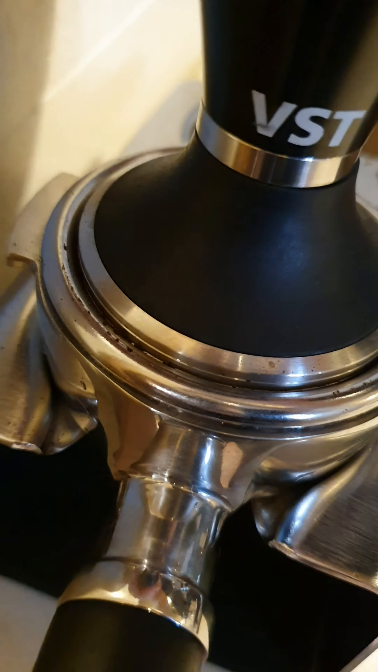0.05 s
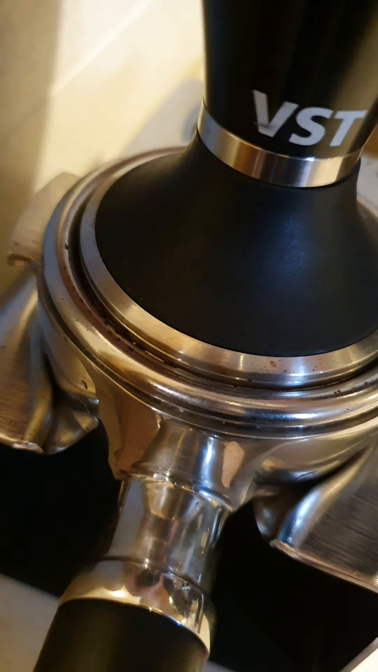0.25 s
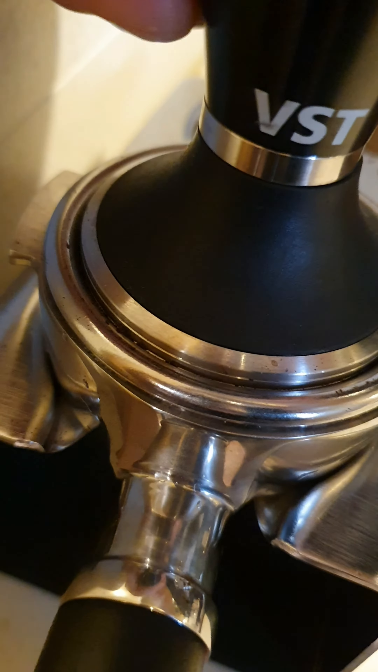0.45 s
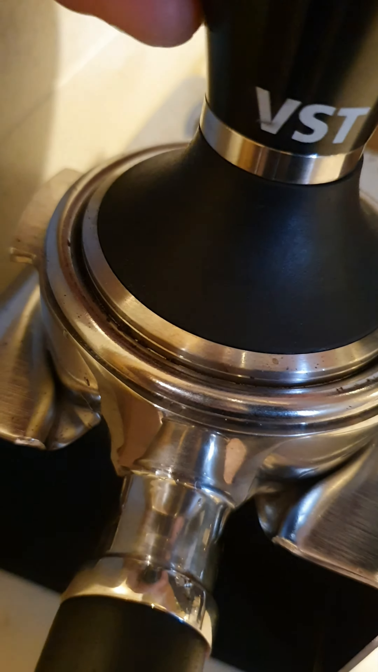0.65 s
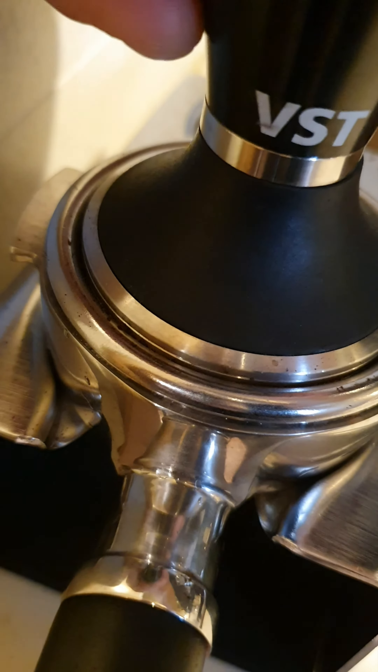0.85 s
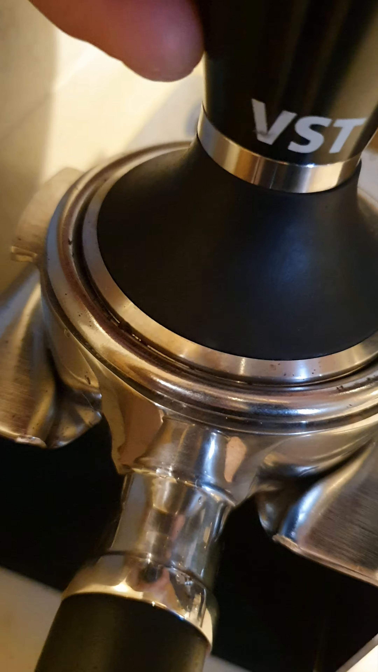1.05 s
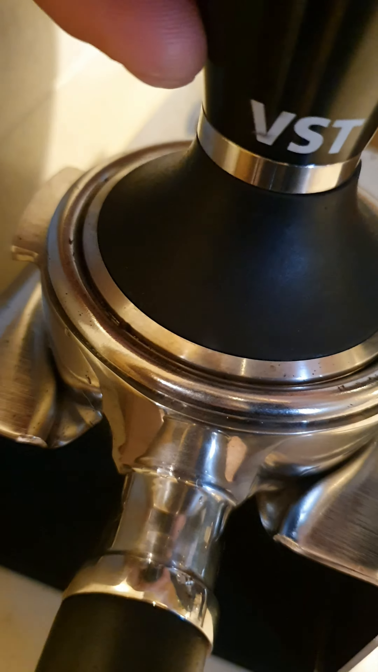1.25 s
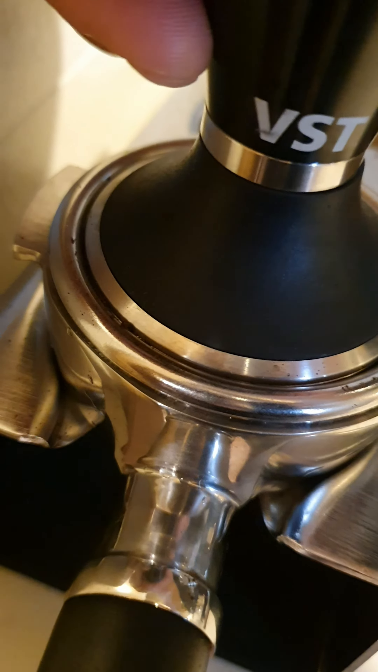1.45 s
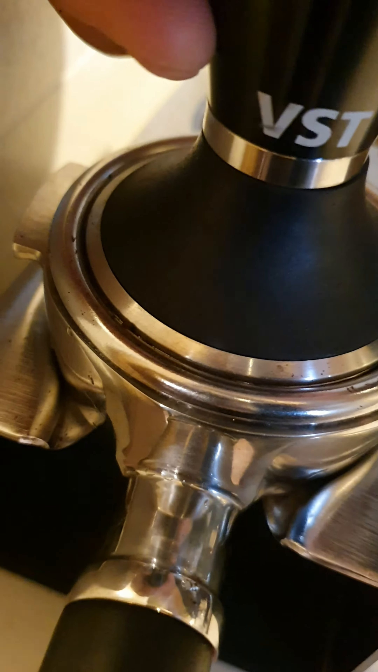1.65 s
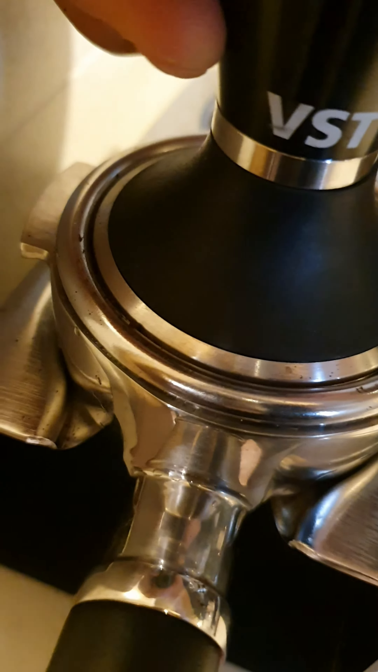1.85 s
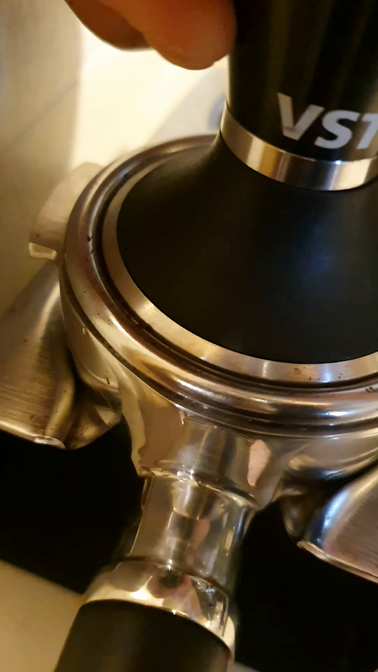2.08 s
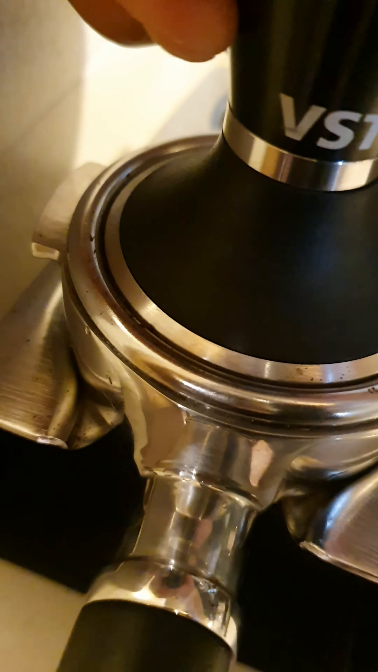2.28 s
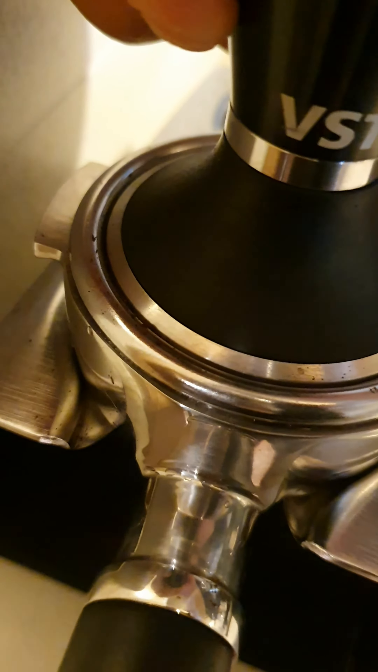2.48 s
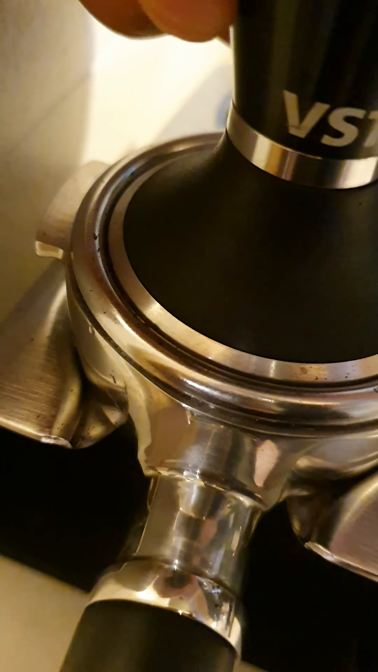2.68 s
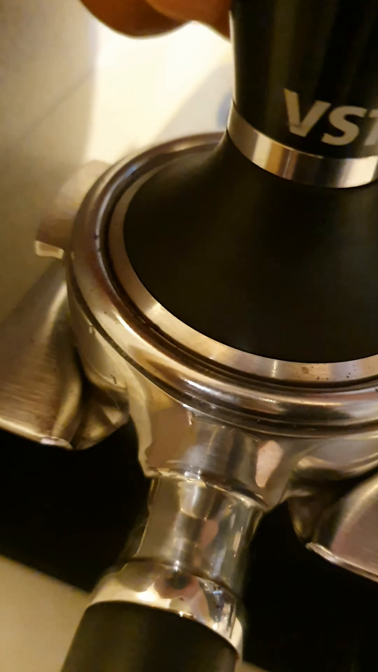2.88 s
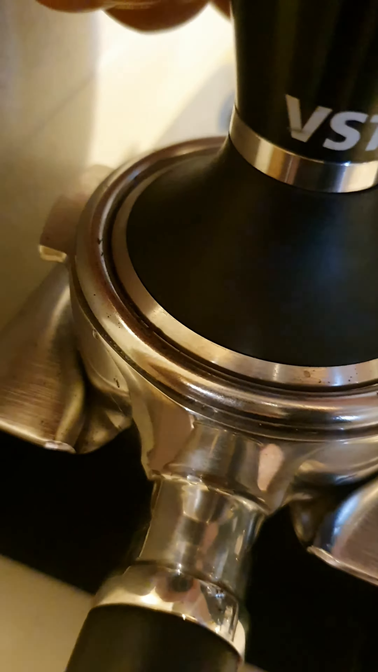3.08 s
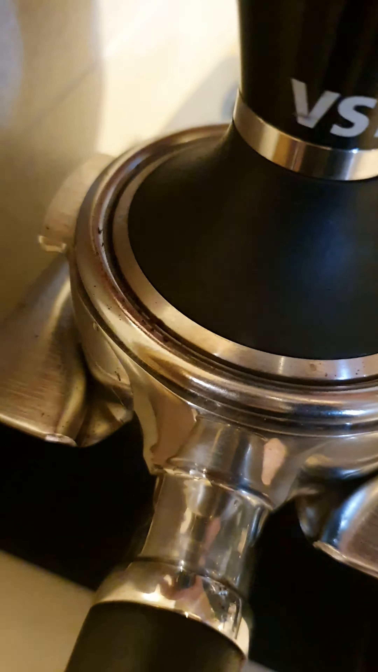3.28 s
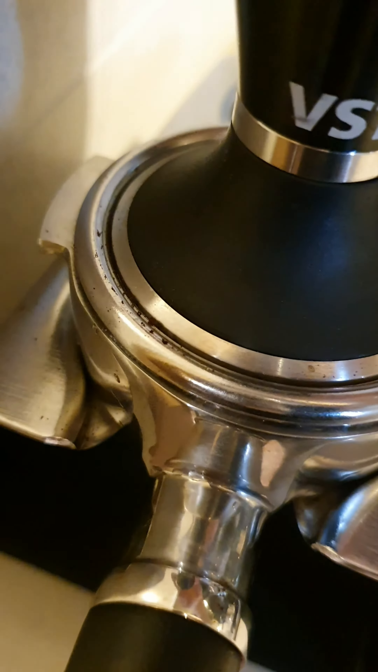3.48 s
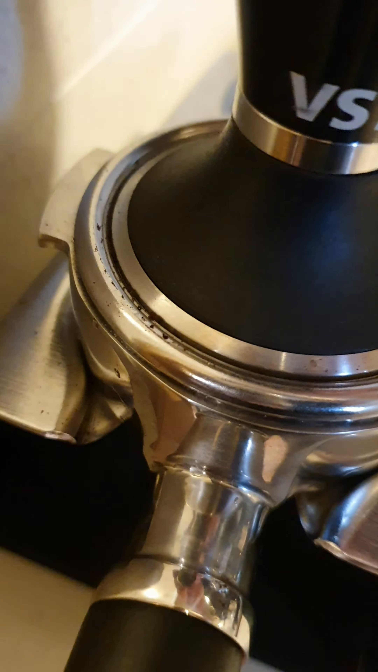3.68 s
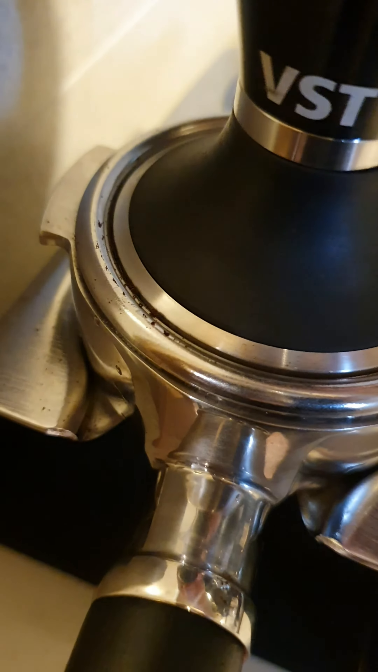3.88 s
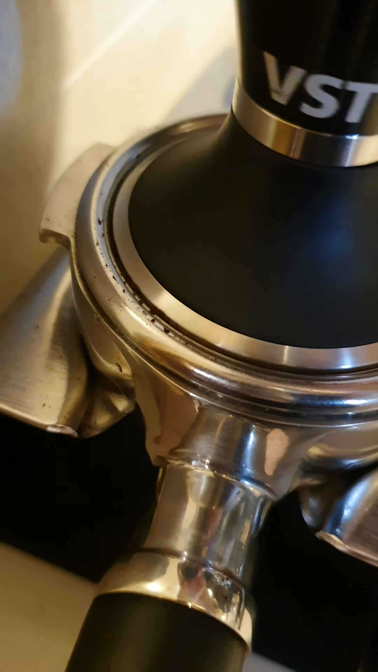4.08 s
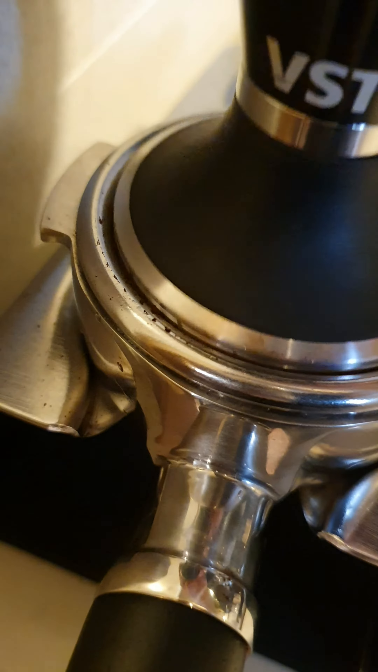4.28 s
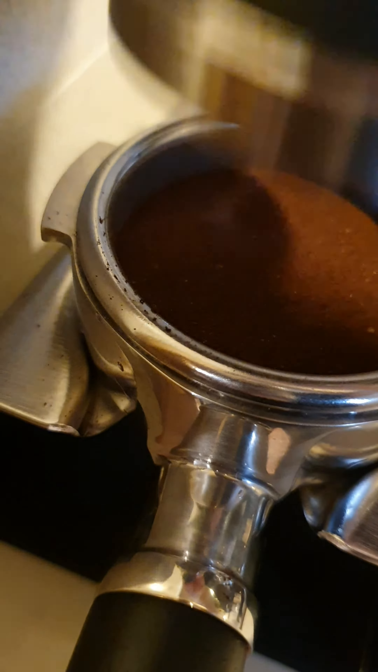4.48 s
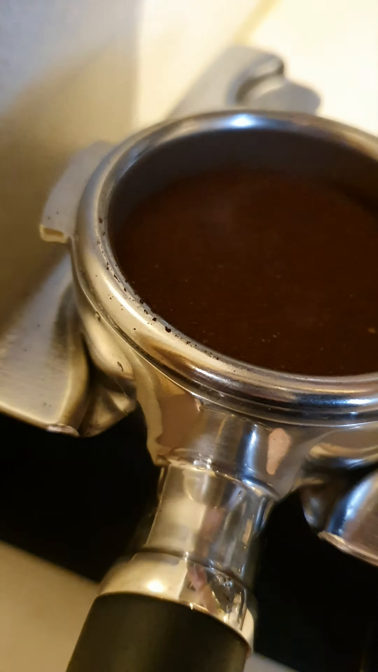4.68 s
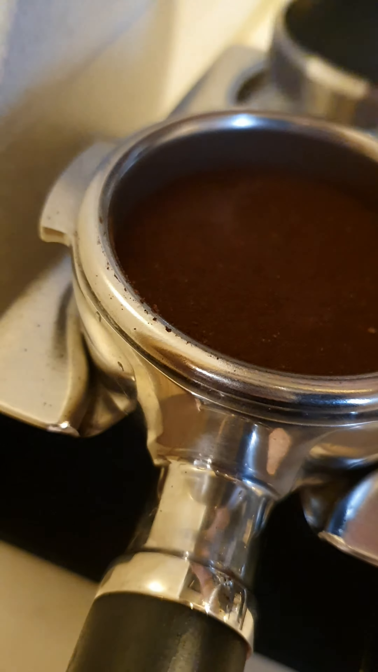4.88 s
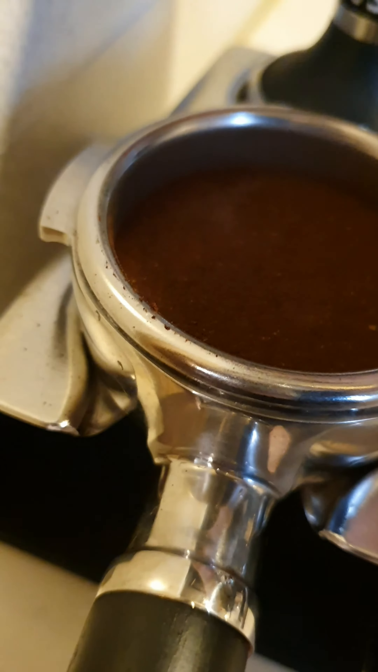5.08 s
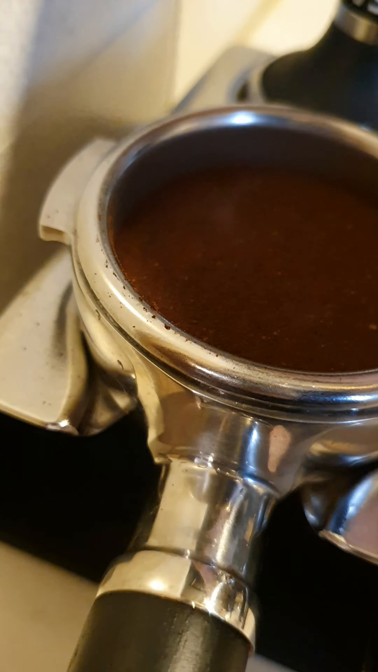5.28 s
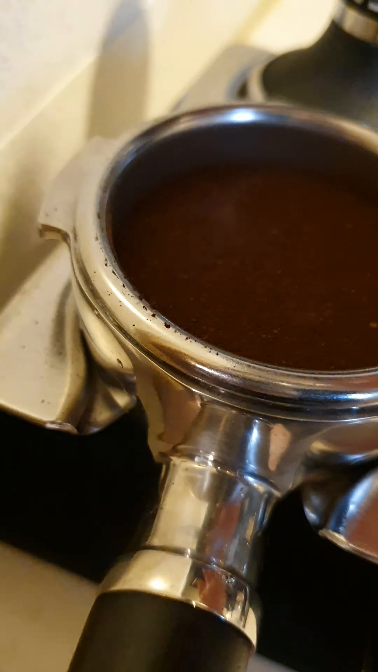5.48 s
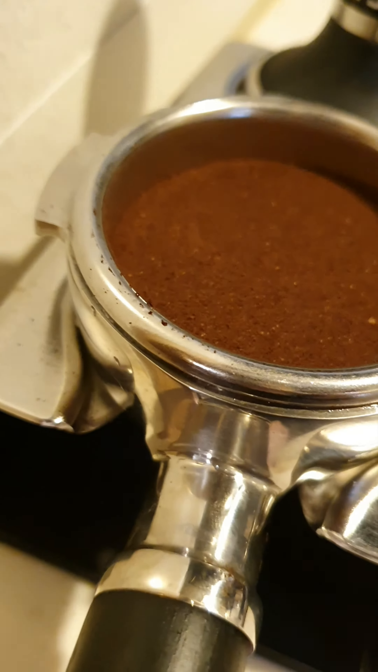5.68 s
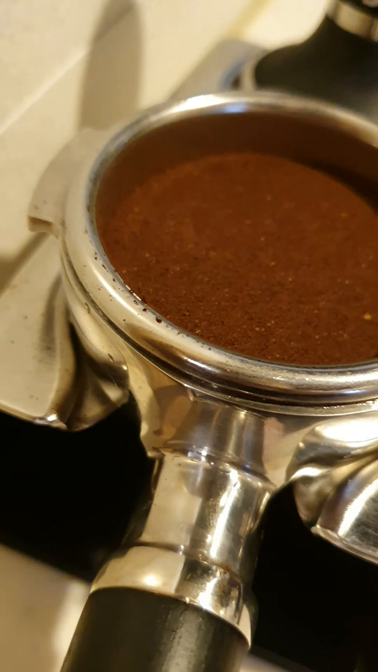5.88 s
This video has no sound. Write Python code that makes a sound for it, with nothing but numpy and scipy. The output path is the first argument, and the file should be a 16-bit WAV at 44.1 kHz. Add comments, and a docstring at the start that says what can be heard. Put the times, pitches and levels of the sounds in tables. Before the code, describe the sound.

Close up in a small kitchen with a faint steady appliance hum, a metal tamper works coffee grounds in a steel basket. Dull knocks, short rubs and low hand rumble come in clusters, with one tiny glass clink at about two seconds. Gritty swishes follow near four seconds, then the tamper lands loudly on the counter at five, rebounds quickly and rings briefly.

```python
"""Tamping coffee by hand

A metal tamper is pressed and twisted on coffee grounds in a steel basket that knocks on its stand, then is
set down on the counter with a clack that bounces. A phone held close hears it in a small kitchen with a
steady appliance hum; a glass clinks once further off. Struck things are sums of decaying modes with contact
noise; rubs and twists are grainy filtered noise; rumble, hum and room tail are shaped noise."""
import sys
import numpy as np
from scipy import signal
from scipy.fft import rfft, irfft
from scipy.io import wavfile
from scipy.ndimage import uniform_filter1d

SR = 44100
rng = np.random.default_rng(int(sys.argv[2]) if len(sys.argv) > 2 else 0)


def unload_wav(signal):
    """Save mono or channel-first audio to the path in sys.argv[1] as 16-bit WAV at rate SR, clipped to [-1, 1]."""
    wavfile.write(
        sys.argv[1],
        SR,
        np.round(np.clip(np.atleast_2d(signal).T, -1, 1) * 32767).astype(np.int16),
    )


def linear_from_db(decibels):
    """Turn decibels (scalar or array-like) into linear amplitude factors; 0 gives 1."""
    return 10 ** (np.asarray(decibels, float) / 20)


N = 261954
T = np.arange(N) / SR
SIDES = np.array([[.5], [-.5]])  # times a left-minus-right difference in dB

# tamper landing on the counter and bouncing: start_s, nominal peak_db, brightness_db_per_octave
LANDINGS = [(5.028, -7.5, 4.5), (5.056, -3.5, 3), (5.144, -12.5, 0.5), (5.313, -52.5, 12)]
# modes of tamper and counter: pitch_hz, relative level_db, t60_s
TAMPER_MODES = [(145, -12.5, 0.3), (183, -11, 0.3), (221.6, -12.5, 0.38), (274.5, 0, 0.3),
                (343.4, -14, 0.42), (378, -5, 0.28), (472, -7, 0.25), (595, -5, 0.2), (665, -11, 0.27),
                (730, -14, 0.2), (850, -10, 0.15), (1365, -1.5, 0.052), (1514, -3, 0.05), (1635, -5, 0.045),
                (1725, -8.5, 0.035), (1838, -9, 0.04), (2667, 2, 0.036), (3450, -3, 0.013),
                (5040, -2, 0.023), (9100, -13.5, 0.025), (11320, -14, 0.016)]
# colour of the landing's contact noise: frequency_hz, relative density_db
LANDING_NOISE = [(71, -47.5), (120, -10), (261, 0), (1070, -14.5), (1340, -7.5), (3520, -13.5), (4230, -18),
                 (11800, -27), (16000, -30)]
# basket knocking on its stand: start_s, nominal peak_db, brightness_db_per_octave
BASKET_KNOCKS = [(0.03, -31.5, -13), (1.203, -29, 5), (1.725, -34.5, -3.5), (1.788, -34.5, -0.5),
                 (1.95, -33.5, -11), (2.294, -38, -2.5), (2.373, -36, -0.5), (2.603, -31.5, 5),
                 (2.668, -32, 0.5), (2.716, -28.5, 10), (2.81, -30.5, -1.5), (3.565, -39, -11),
                 (4.063, -28, 0.5)]
# modes of basket, handle and stand: pitch_hz, relative level_db, t60_s
BASKET_MODES = [(124, -17, 0.048), (230.5, -15, 0.25), (275, -2, 0.092), (402, -2.5, 0.038),
                (646, -3, 0.055), (1400, -1, 0.027), (1492, 14, 0.021), (2050, -4, 0.066),
                (2950, -18, 0.012), (3610, -20, 0.016)]
# colour of the knocks' contact noise: frequency_hz, relative density_db
KNOCK_NOISE = [(60, 0), (200, 18), (650, 14.5), (1000, 11.5), (2000, 8), (5000, -14), (8000, -28),
               (16000, -24)]
# tamper rim twisting against grounds and basket wall: start_s, length_s, level_db
RIM_TWISTS = [(1.68, 0.12, -64), (2.61, 0.076, -64.5), (2.71, 0.11, -63.5), (2.827, 0.138, -63),
              (2.95, 0.13, -67), (3.266, 0.074, -68), (3.741, 0.16, -56.5), (3.927, 0.081, -55.5),
              (4.007, 0.095, -56), (4.085, 0.097, -61.5), (3.778, 0.79, -70), (4.196, 0.069, -70),
              (4.304, 0.11, -53)]
# colour of crushed grit: frequency_hz, relative density_db
GRIT_COLOUR = [(1500, -3), (2800, 2), (4000, -5), (6300, 1), (7100, -2), (8000, 3), (10500, -6),
               (14500, -5), (16000, -18)]
# broad rubs of steel on the stand: start_s, nominal length_s, level_db
STEEL_RUBS = [(0., 0.1, -51.5), (1.558, 0.044, -51), (1.611, 0.051, -54), (2.911, 0.022, -49),
              (3.011, 0.049, -58.5), (3.192, 0.12, -63), (3.647, 0.053, -63), (5.458, 0.061, -63),
              (5.682, 0.12, -57.5)]
# narrow squeaks: start_s, nominal length_s, level_db, pitch_hz
NARROW_SQUEAKS = [(1.071, 0.072, -58, 1294), (4.352, 0.047, -65.5, 2800), (4.612, 0.07, -57.5, 935)]
# single gritty ticks: start_s, nominal length_s, level_db, centre_hz
GRITTY_TICKS = [(1.006, 0.012, -67, 9000), (1.032, 0.0079, -65, 9000), (1.495, 0.015, -69.5, 6800),
                (2.205, 0.01, -60.5, 900), (2.64, .008, -66.5, 8300), (2.899, 0.005, -65, 5000),
                (2.983, 0.0046, -45, 1100), (3.324, 0.0084, -55, 13500), (3.4, 0.0027, -54, 860)]
# dull thumps of the counter as the hand shifts its weight: start_s, nominal peak_db, pitch_hz
COUNTER_THUMPS = [(1.208, -40, 266), (1.728, -42.5, 211), (1.762, -38, 275), (1.8, -42.5, 279.6),
                  (2.815, -37, 109), (2.967, -35.5, 107), (2.987, -46, 125), (3.74, -42.5, 266),
                  (3.77, -41.5, 262), (3.801, -44, 332.6)]
# hand pressure felt through the counter: time_s, rumble level_db
HAND_PRESSURE = [(0.0, -62), (0.4, -65), (0.65, -68), (1.27, -59), (1.45, -59), (1.8, -54.5), (2.15, -61.5),
                 (2.5, -53.5), (2.8, -51.5), (2.9, -49), (3.1, -60.5), (3.36, -65.5), (3.9, -58),
                 (4.4, -62.5), (5.0, -60), (5.9, -62.5)]
# the glass touched once: start_s, nominal peak_db, brightness_db_per_octave
GLASS_CLINK = [(2.0739, -41.5, -1.5)]
# modes of the glass: pitch_hz, relative level_db, t60_s
GLASS_MODES = [(3042, 2, .09), (4250, -3, .08), (4301, -2, .21), (5814, 3, .17), (7574, -8, .11),
               (9485, -8, .1), (10520, -6, .09), (11570, -6, .11), (13880, -9, .08)]
# decay of the room: frequency_hz, t60_s
ROOM_DECAY = [(60, 0.77), (250, 0.45), (480, 0.57), (900, 0.39), (2000, 0.18), (6000, 0.24), (14000, 0.3)]
# colour of the appliance hum: frequency_hz, relative density_db
HUM_COLOUR = [(15, -34.5), (30, -4.5), (45, -7), (59, -11), (153, -30.5), (263, -5), (317, -26),
              (344, -13.5), (545, -17), (887, -19.5), (1940, -22), (3620, -38), (12000, -47.5),
              (15700, -47.5), (16000, -74.5)]
# narrow bands that stand out of the hum, or dip if negative: centre_hz, width_hz, height_db
HUM_BANDS = [(279.3, 15, 9), (564, 40, 7.5), (1280, 640, -7), (1604, 78, 7.5), (2098, 49, 9.5),
             (2318, 77, 7), (3084, 15, 10), (4657, 770, 7.5), (9000, 1700, 6)]
# correlation of left and right in the hum: frequency_hz, likeness_0_to_1
HUM_LIKENESS = [(130, 0.96), (290, 0.85), (640, 0.3), (1400, 0.)]
# balance of the hum: frequency_hz, left_minus_right_db
HUM_LEAN = [(60, 5), (700, 3.5), (1290, -3), (2380, 4.5), (8000, 4.5), (15000, 4)]


def over_hz(table, count):
    """Log-frequency interpolation: a table read at the spectral bins of count samples."""
    hz, value = np.transpose(table)
    return np.interp(np.log(np.fft.rfftfreq(count, 1 / SR) + 1), np.log(hz), value)


def unit(x):
    """Normalisation to an rms of 1."""
    return x / np.sqrt(np.mean(x ** 2))


def noise(table, count):
    """Spectral shaping: white noise takes the colour of a table, at rms 1."""
    spectrum = rfft(rng.standard_normal(count)) * linear_from_db(over_hz(table, count))
    return unit(irfft(spectrum, count))


def band(x, hz, width):
    """Band-pass filtering around a centre, as by one broad resonance."""
    edges = np.clip([hz - width / 2, hz + width / 2], 20, .45 * SR)
    return signal.sosfilt(signal.butter(2, edges, "band", fs=SR, output="sos"), x)


def curve(rows, rest_db):
    """Linear interpolation of level in dB over time."""
    s, db = np.transpose(rows)
    return np.interp(T, s, db, rest_db, rest_db)


def flicker(rate, db):
    """Random amplitude modulation: smoothed gain steps about 1, rate of them a second."""
    k = int(SR / rate)
    steps = np.repeat(rng.standard_normal(N // k + 1), k)
    return linear_from_db(db * uniform_filter1d(steps, k)[:N])


def add(out, x, s):
    """Superposition: a stereo sound is mixed in at a time."""
    i = int(s * SR)
    out[:, i:i + x.shape[1]] += x[:, :N - i]


def contact(table, tilt_db, count):
    """Contact noise: a brighter blow has less bass; both ports share the bass but differ above it."""
    table = [(hz, db + 0.32 * tilt_db * np.log2(np.clip(hz, 220., 1500.) / 1000)) for hz, db in table]
    mid = noise(table, count)
    side = band(noise(table, count), 8670.0, 17000.)
    return mid + 2 * SIDES * side


def modal_ring(modes, tilt_db, t, split_hz, apart, scatter_db):
    """Modal synthesis: beating decaying sines, the high ones at unlike phases in the two ports."""
    hz, db, t60 = np.transpose(modes)[:, :, None]
    tilt = tilt_db * np.log2(np.maximum(hz, 300.) / 1000)
    gain = linear_from_db(db + tilt + scatter_db * rng.standard_normal(hz.shape))
    lag = rng.uniform(0, 2 * np.pi, (2, len(hz), 1)) * np.clip(hz / 1500 - .15, 0, apart)
    beat_hz = split_hz * rng.uniform(.5, 0.91, hz.shape)
    beat = 1 + 0.57 * np.cos(2 * np.pi * beat_hz * t + lag)  # modes come in close pairs
    decay = np.exp(-np.log(1000) * t / t60)
    ring = (gain * beat * decay * np.sin(2 * np.pi * hz * t + lag)).sum(axis=1)
    return ring / np.sqrt(np.sum(gain ** 2))


def blows(rows, modes, rise_s, chatter_s, chatter, pan_db, split_hz, apart, scatter_db, crack_db, crack):
    """Impact excitation: each blow and its brief chatter ring the modes and make contact noise."""
    rings, cracks, t = np.zeros((2, N)), np.zeros((2, N)), T[:SR // 2]
    hardest_db = max(row[1] for row in rows)
    for s, peak_db, tilt_db in rows:
        # lighter blows chatter for less time; duller contact starts slower
        fade_s = chatter_s * linear_from_db(max(0.5 * (peak_db - hardest_db), -5.))
        fade = np.exp(-(t / fade_s) ** 2)
        rise = 1 - np.exp(-(t / rise_s / linear_from_db(max(-tilt_db, 0))) ** 2)
        push = chatter * rng.standard_normal(len(t)) * fade
        push[0] = 1  # first contact
        push = push / np.sqrt(np.sum(push ** 2))
        ring = modal_ring(modes, tilt_db, t, split_hz, apart, scatter_db) * rise
        sound = signal.fftconvolve(ring, push[None], axes=1)[:, :len(t)]
        hiss = contact(crack, tilt_db, len(t)) * fade * rise
        add(rings, sound * linear_from_db(peak_db + SIDES * pan_db), s)
        add(cracks, hiss * linear_from_db(peak_db + crack_db + SIDES * pan_db), s)
    return rings, cracks


def landing_clacks():
    """Repeated impact: the tamper strikes the counter and bounces; returns ring and contact noise."""
    return blows(LANDINGS, TAMPER_MODES, rise_s=0.00021, chatter_s=0.013, chatter=.03, pan_db=4.0,
                 split_hz=18.0, apart=0.99, scatter_db=1.0, crack_db=-11.0, crack=LANDING_NOISE)


def basket_knocks():
    """Soft impact: the basket strikes its stand with a slower rise; returns ring and contact noise."""
    return blows(BASKET_KNOCKS, BASKET_MODES, rise_s=0.0022, chatter_s=0.011, chatter=.045, pan_db=2.0,
                 split_hz=7.1, apart=0.74, scatter_db=2, crack_db=-11.0, crack=KNOCK_NOISE)


def twists():
    """Granular crushing: grit under the turning rim swishes, swelling slowly and stopping sooner."""
    push = 0
    for s, length, db in RIM_TWISTS:
        phase = np.clip((T - s) / length, 0, 1) ** 1.6
        push = push + linear_from_db(db) * np.abs(np.sin(np.pi * phase)) ** 1.9
    crunch = unit(uniform_filter1d(linear_from_db(5.25 * rng.exponential(size=N)), size=40))
    grit = np.array([noise(GRIT_COLOUR, N), noise(GRIT_COLOUR, N)])
    return grit * push * crunch * flicker(61, 2) * linear_from_db(SIDES * 1.0)


def scrape(rows, pan_db):
    """Stick-slip friction: dense grains through one resonance, with a quick start and a softer end."""
    out, likeness = np.zeros((2, N)), .2  # correlation of left and right grains
    for s, length, db, hz, width in rows:
        t = T[:int(length * SR) + SR // 20]
        start = np.minimum(t / min(0.16 * length, .005), 1)
        end = np.clip((1.15 * length - t) / (0.57 * length), 0, 1)
        grains = rng.standard_normal((2, SR // 4))
        bursts = linear_from_db(1.9 * rng.exponential(size=SR // 4))
        grains = (grains * bursts)[:, :len(t)]
        grains[1] = likeness * grains[0] + np.sqrt(1 - likeness ** 2) * grains[1]
        add(out, unit(band(grains, hz, width)) * start * end * linear_from_db(db + SIDES * pan_db), s)
    return out


def rubs():
    """Resonant friction: rubs share one broad resonance, squeaks are narrow, ticks short and wide."""
    broad = [(s, length, db, 1416, 840) for s, length, db in STEEL_RUBS]  # centre and width in Hz
    narrow = [(s, length, db, hz, 0.19 * hz) for s, length, db, hz in NARROW_SQUEAKS]
    short = [(s, length, db, hz, min(0.85 * hz, 4990)) for s, length, db, hz in GRITTY_TICKS]
    return scrape(broad + narrow + short, pan_db=12.5)


def thumps():
    """Single-mode response: each thump is one low mode that swells for a cycle and dies away."""
    out, t, t60_s = np.zeros((2, N)), T[:SR // 4], .14
    for s, db, hz in COUNTER_THUMPS:
        shape = (1 - np.exp(-(t * hz) ** 2)) * linear_from_db(-60 * t / t60_s)
        add(out, shape * np.sin(2 * np.pi * hz * t) * linear_from_db(db + SIDES * 2.9), s)
    return out


def hand():
    """Structure-borne sound: counter rumble and boom follow hand pressure, nearly alike at both ports."""
    mid, side = rng.standard_normal((2, N))
    both = mid + 0.52 * SIDES * side
    rumble_db = curve(HAND_PRESSURE, rest_db=-64)
    boom_db = -62 + 0.28 * (rumble_db + 61.5)  # the boom varies less than the rumble
    rumble = unit(band(both, 61.0, 67.0)) * linear_from_db(rumble_db)
    boom = unit(band(both, 245.0, 79.7)) * linear_from_db(boom_db)
    return (rumble * flicker(6, 0.73) + boom * flicker(8, 1.8)) * linear_from_db(SIDES * 1.7)


def glass_clink():
    """Light impact on a resonator: one touch rings the beating glass modes, with contact noise."""
    return sum(blows(GLASS_CLINK, GLASS_MODES, rise_s=0.0015, chatter_s=0.03, chatter=0.02, pan_db=0.5,
                     split_hz=70.0, apart=.4, scatter_db=1, crack_db=-18, crack=GRIT_COLOUR))


def kitchen(dry):
    """Diffuse reverberation: octave bands of noise die at their own rates, alike only in the bass."""
    t, tail = T[:SR // 2], 0
    hz, t60 = np.transpose(ROOM_DECAY)
    for centre in 60 * 2. ** np.arange(9):
        fade = np.exp(-np.log(1000) * t / np.interp(np.log(centre), np.log(hz), t60))
        mid, side = band(rng.standard_normal((2, len(t))), centre, 0.94 * centre) * fade
        spread = min(centre / 700, 1)
        tail = tail + (mid + 2 * SIDES * side * spread) / np.hypot(1, spread)
    tail = tail * np.minimum(t / 0.012, 1) * linear_from_db(SIDES * 1.0)  # reflections build up
    tail = tail / np.sqrt(np.sum(tail ** 2) / 2)
    return signal.fftconvolve(dry.mean(axis=0)[None], tail, axes=1)[:, :N]


def hum():
    """Partly coherent noise field: appliance hum, alike in the bass and unrelated in the treble."""
    hz = np.fft.rfftfreq(N, 1 / SR)
    db = over_hz(HUM_COLOUR, N)
    for centre, width, height_db in HUM_BANDS:
        db = db + height_db / (1 + (2 * (hz - centre) / width) ** 2)
    like = np.clip(over_hz(HUM_LIKENESS, N), -.9, .99)
    mid, side = rfft(rng.standard_normal((2, N)))
    pair = np.sqrt(1 + like) * mid + 2 * SIDES * np.sqrt(1 - like) * side
    sound = unit(irfft(pair * linear_from_db(db + SIDES * over_hz(HUM_LEAN, N)), N))
    return sound * linear_from_db(-56) * flicker(1.0, 0.27)


def scene():
    """Direct and reverberant sound: rings stay close, while contact noise fills the room."""
    ring, crack = landing_clacks()
    knock, thud = basket_knocks()
    clink = glass_clink()
    near = rubs() + twists() + thumps()
    wet = linear_from_db(-18.0) * ring + linear_from_db(-4.5) * crack + linear_from_db(-5.5) * knock + linear_from_db(0.6) * thud
    wet = wet + linear_from_db(1.5) * clink + linear_from_db(-9.0) * near
    return ring + crack + knock + thud + clink + near + kitchen(wet) + hand() + hum()


def gain_control(x, knee_db, share, release_db):
    """Peak-held compression: share of the excess over the knee is cut; the hold falls release_db a second."""
    level = 20 * np.log10(np.abs(x).max(axis=0) + 1e-9)
    held = np.maximum.accumulate(level + release_db * T) - release_db * T
    k = int(.1 * SR)
    # mean over the last 0.1 s, so the gain turns down within a moment
    excess = uniform_filter1d(np.maximum(held - knee_db, 0), k, origin=(k - 1) // 2)
    return x * linear_from_db(-share * excess)


def low_pass(x):
    """Removes everything above the highest recorded frequency."""
    return signal.sosfilt(signal.butter(12, 16810, fs=SR, output="sos"), x)


def record(dry):
    """Filtering, compression and saturation: the phone cuts deep bass, rides gain and rounds loud peaks."""
    thin = signal.sosfilt(signal.butter(4, 38., "high", fs=SR, output="sos"), dry)
    steadied = gain_control(thin, knee_db=-26.5, share=0.13, release_db=.5)
    rounded = np.tanh(1.248 * steadied) / 1.048
    return low_pass(rounded)


dry = scene()
out = record(dry)
unload_wav(out)
```